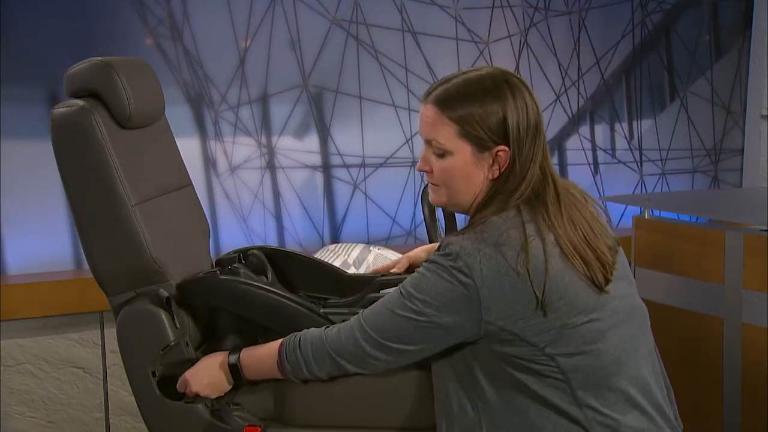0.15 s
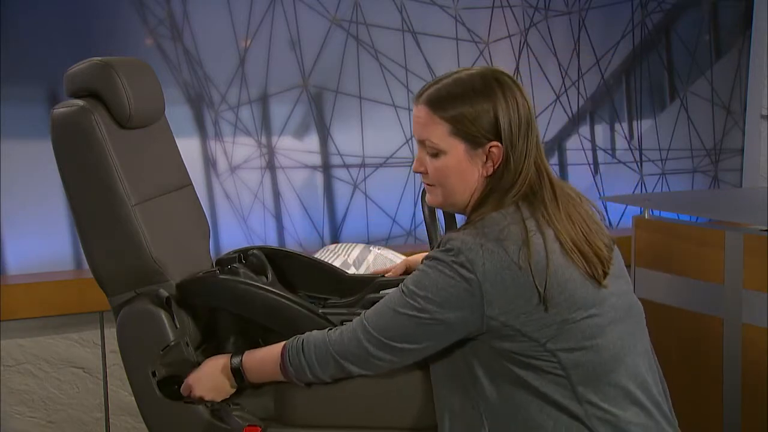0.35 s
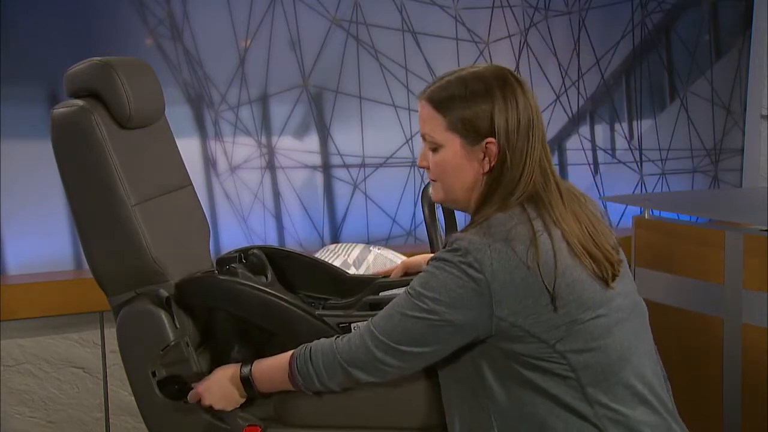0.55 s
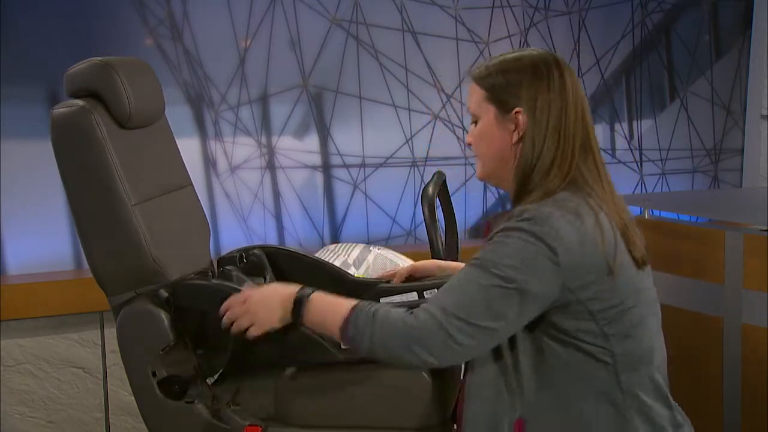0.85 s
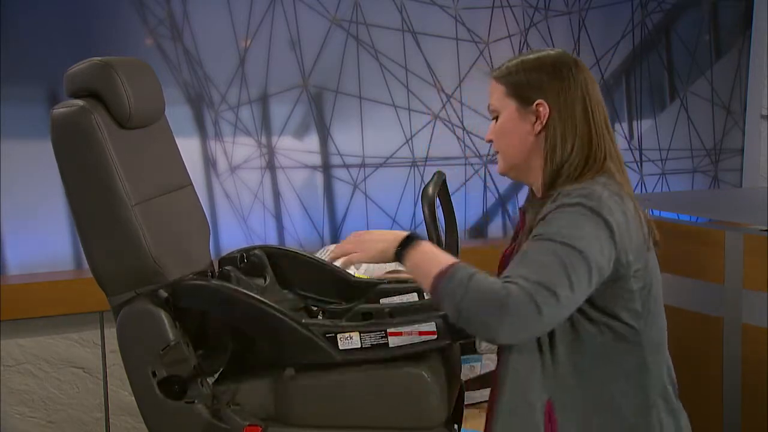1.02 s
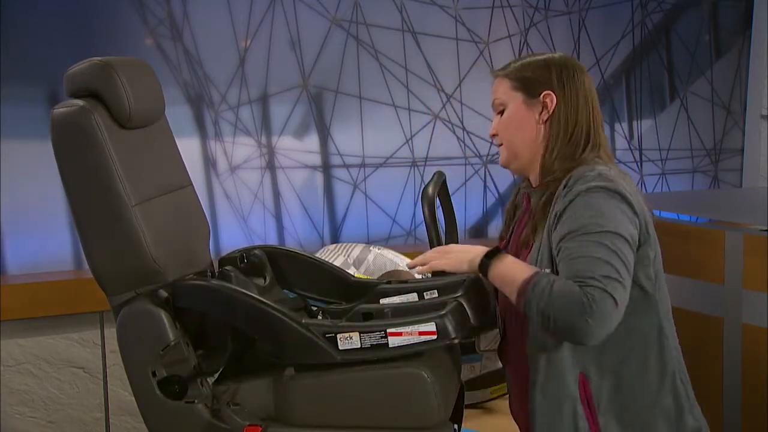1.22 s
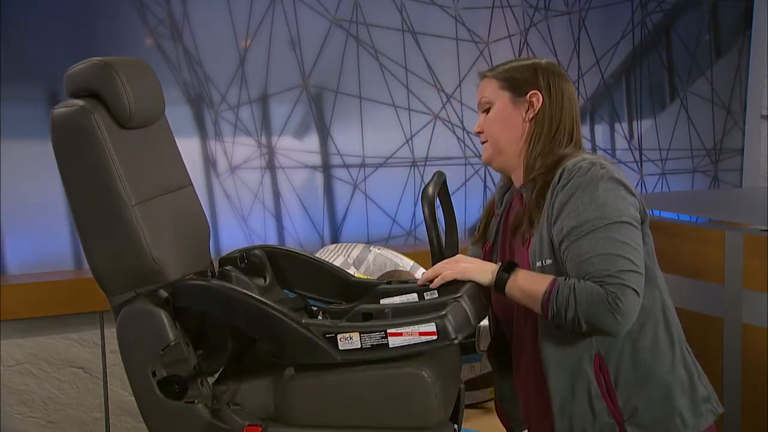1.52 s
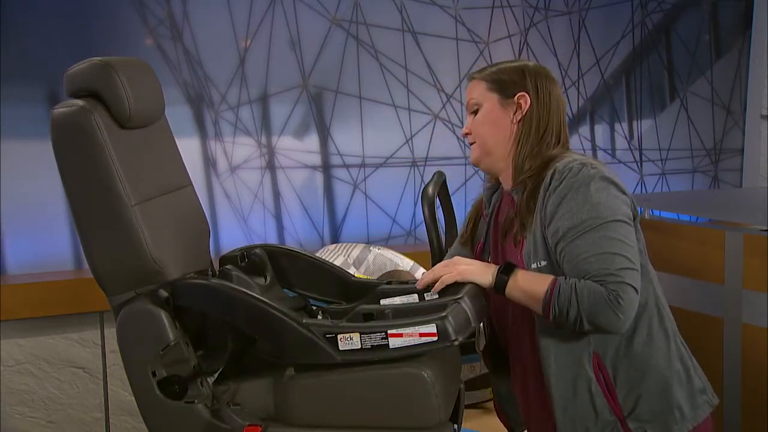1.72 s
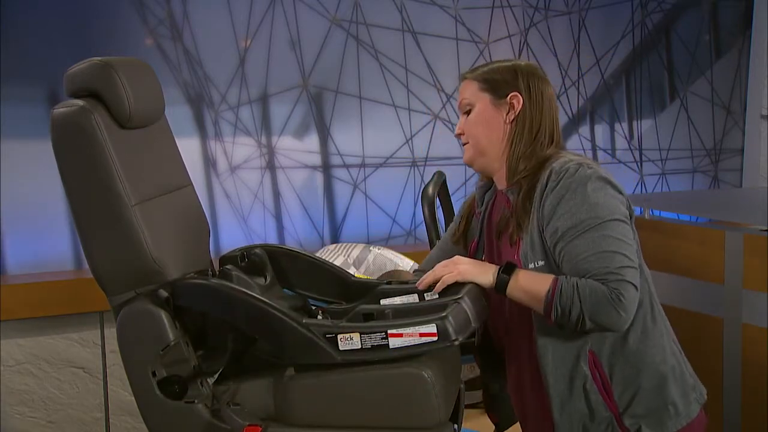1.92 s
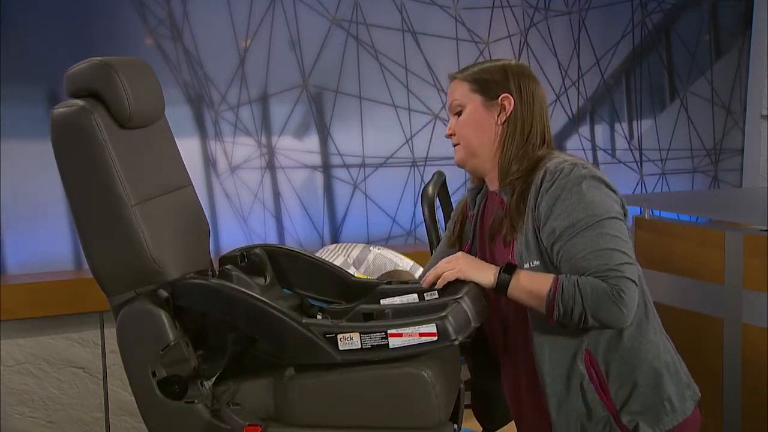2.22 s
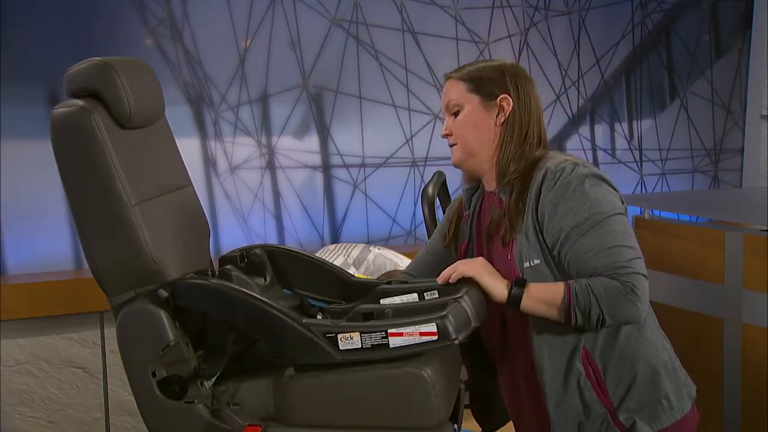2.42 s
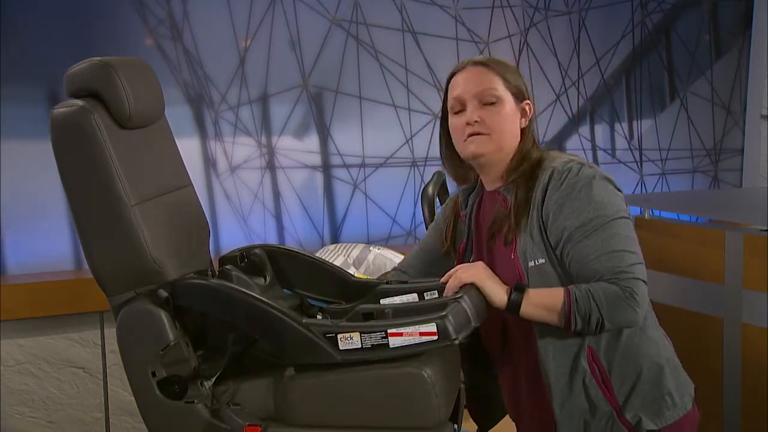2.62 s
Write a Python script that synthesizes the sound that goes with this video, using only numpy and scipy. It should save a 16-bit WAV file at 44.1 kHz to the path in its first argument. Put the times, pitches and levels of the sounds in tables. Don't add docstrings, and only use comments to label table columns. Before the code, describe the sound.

Dull plastic thuds and a sharp metal hook snap as a child seat base is fitted

```python
import sys
import numpy as np
from scipy import signal
from scipy.fft import rfft, irfft
from scipy.io import wavfile

SR = 44100
rng = np.random.default_rng(int(sys.argv[2]) if len(sys.argv) > 2 else 0)


def waveform_to_disk(signal):
    frames = np.transpose(np.atleast_2d(signal))
    scaled = np.clip(frames, -1, 1) * 32767
    samples = np.round(scaled).astype(np.int16)
    wavfile.write(sys.argv[1], SR, samples)


def ratio_of_db(decibels):
    return 10 ** (np.asarray(decibels, float) / 20)


N = 121275

# frequency in Hz, level in dB.
AIR_SPECTRUM = [(15, -65), (25, 1), (130, 5.5), (354, -10.5), (427, -12.5), (695, -21.5), (9320, -27),
                (14000, -34.5), (16000, -52)]
# frequency in Hz, level in dB.
FAN_HUMS = [(118, -62), (428, -66.5)]
# start in seconds, length in seconds, cloth hiss in dB, shell rumble in dB,
# share of the length spent rising.
STROKES = [(-0.05, .2, -37.5, -31.5, 0.51), (0.127, 0.079, -82, -40, .2), (0.324, 0.1, -53.5, -38, 0.13),
           (0.501, 0.26, -50.5, -46, 0.56), (0.649, 0.28, -39, -38, 0.64), (0.913, 0.061, -50.5, -39, .5),
           (1.144, 0.35, -57, -64, 0.69), (1.447, 0.15, -74.5, -59, 0.1), (1.563, 0.076, -49, -42.5, 0.21),
           (1.675, 0.19, -53.5, -46, 0.058), (1.827, 0.069, -61, -64, 0.83), (1.903, 0.22, -58, -47, 0.083),
           (2.04, 0.046, -54, -62, .4), (2.273, 0.034, -47, -42.5, 0.14), (2.474, 0.11, -47.5, -37, 0.22),
           (2.547, 0.23, -47.5, -49.5, 0.067)]
# frequency in Hz, level in dB.
HISS_SPECTRUM = [(710, -7), (1200, 0.5), (1610, 0), (3830, -4), (4170, -6), (7100, -7.5), (11900, -9.5),
                 (16000, -14)]
# frequency in Hz, level in dB.
RUMBLE_SPECTRUM = [(18, -43), (30, -15), (160, 4), (223, -0.5), (347, -2), (1000, -1), (1190, -8.5),
                   (1590, -9), (3000, -23), (3900, -71), (6600, -120)]
# start in seconds, peak in dB, frequency the struck spot favours in Hz,
# crack relative to the peak in dB.
KNOCKS = [(0.04, -22, 583, -78), (0.051, -29, 690, -27), (0.175, -36, 637, -7), (0.193, -41.5, 422, -6),
          (0.262, -29.5, 285, -22), (0.282, -32, 692, -12), (0.304, -34, 568, -34), (0.331, -30, 506, -22),
          (0.354, -32.5, 730, -51), (0.654, -22.5, 2360, -5.5), (0.675, -11.5, 280, -27),
          (0.743, -25, 266, -7), (0.842, -27.5, 212, -21), (0.943, -38, 245, -7), (1.257, -41.5, 306.5, -8),
          (1.327, -37.5, 250, -19), (1.383, -30, 202, -28), (1.458, -40.5, 750, -18),
          (1.564, -19, 217, -41), (1.596, -25.5, 250, -21), (1.665, -5, 243, -16), (1.754, -23.5, 240, -35),
          (1.782, -16.5, 283, -33.5), (1.894, -11, 285, -26.5), (2.166, -43, 568, -31),
          (2.273, -36, 586, -18.5), (2.294, -39.5, 468, -9.5), (2.31, -6.5, 713, -23)]
# frequency in Hz, level in dB, T60 in seconds.
SHELL_MODES = [(203, -11, 0.056), (245, -1, 0.047), (285, -7.5, 0.049), (456, -3, 0.01), (630, -0.5, 0.031),
               (747, -3.5, .025), (845, 3, 0.021), (1224, -1.5, 0.016), (1613, -2, .012),
               (2240, -1.5, 0.013)]
# frequency in Hz, level in dB.
CLATTER_SPECTRUM = [(200, -43), (500, 4.5), (1200, 1.5), (3000, -14.5), (6000, -33)]
# frequency in Hz, level in dB.
CRACK_SPECTRUM = [(2000, -40), (3000, 9.5), (16000, -13)]
# start in seconds, length in seconds, level in dB, slip rate in Hz.
SQUEAKS = [
    (0.065, 0.014, -30.5, 640),
    (0.075, .009, -26, 630),
    (0.087, 0.014, -26, 640),
    (0.105, 0.02, -32.5, 650),
]
# level in dB, from the fundamental up.
SQUEAK_PARTIALS_DB = [-10, 0, -24, -5]
# start in seconds, peak in dB, rattle T60 in seconds, ring of the low modes in dB,
# ring of the high modes in dB.
HOOK_HITS = [
    (0.4062, -18.5, 0.051, -4, -33),
    (0.4132, -7, 0.016, -11.5, -12.5),
]
# start in seconds, peak in dB, rattle T60 in seconds, ring of the low modes in dB,
# ring of the high modes in dB.
BUCKLE_HITS = [
    (2.458, -17, 0.018, -15, -16.5),
    (2.4635, -27.5, 0.091, 11, -9),
    (2.538, -14.5, 0.039, -11.5, -5.5),
]
# frequency in Hz, level in dB, T60 in seconds.
HOOK_MODES = [(650, -1, .025), (1640, -4, .025), (2900, -4, .02), (4015, -29, .55), (4110, -6, .07),
              (7763, -30, .45), (7900, -6, .04), (8915, -30, .45), (10640, -32, .3), (12060, -28, .2)]
# frequency in Hz, level in dB, T60 in seconds.
BUCKLE_MODES = [(250, -9, .06), (400, -13, .06), (700, -9, .04), (870, -9, .05), (1217, -7, .07),
                (1453, -16, .4), (1529, -10, .12), (2751, -22, .12), (3208, -23, .3), (7854, -8, .07),
                (7975, -16, .32), (11340, -26, .25), (13480, -23, .2)]
# frequency in Hz, level in dB.
RATTLE_SPECTRUM = [(180, 8), (300, -0.5), (3950, -2), (5340, -12), (8090, -3.5), (9550, -10),
                   (14500, -17.5), (16000, -32)]
# frequency in Hz, level in dB.
SWAY_SPECTRUM = [(20, -1), (50, -3.5), (200, -5.5), (400, -22), (1000, -72)]
# frequency in Hz, level in dB.
SPRAY_SPECTRUM = [(6000, -40), (9000, -9), (12500, 3), (14500, 11), (16000, 2)]
# frequency in Hz, T60 in seconds.
STUDIO_T60 = [(100, .5), (300, .5), (1000, 0.9649), (3000, 0.46), (8000, 0.57), (15000, .35)]
# frequency in Hz, level in dB.
STUDIO_COLOUR = [(70, -16), (200, 2.5), (1000, -7.5), (3000, -3), (8000, 0), (15000, 1)]
# delay in seconds, level in dB.
ECHOES = [(0.0139, -16), (0.029, -21.5), (0.04, -21.5)]


def rms_one(x):
    return x / np.sqrt(np.mean(x ** 2) + 1e-20)


def at_hz(points, hz):
    table_hz, values = np.transpose(points)
    return np.interp(np.log(hz), np.log(table_hz), values)


def band_pass(x, order, low_hz, high_hz):
    sos = signal.butter(order, [low_hz, high_hz], "band", fs=SR, output="sos")
    return signal.sosfilt(sos, x)


def coloured(spectrum):
    hz = np.maximum(np.fft.rfftfreq(N, 1 / SR), 1)
    white = rfft(rng.standard_normal(N))
    return rms_one(irfft(white * ratio_of_db(at_hz(spectrum, hz)), N))


def drift(rate_hz):
    pole = np.exp(-2 * np.pi * rate_hz / SR)
    noise = rng.standard_normal(N + SR)
    settled = signal.lfilter([1], [1, -2 * pole, pole * pole], noise)[SR:]
    return rms_one(settled)


def ring(start, db, hz, t60):
    impulses = np.full(N, 1e-18)
    impulses[(start * SR).astype(int)] = ratio_of_db(db)
    radius = ratio_of_db(-60 / (t60 * SR))
    angle = 2 * np.pi * hz / SR
    return signal.lfilter([0, np.sin(angle)], [1, -2 * radius * np.cos(angle), radius ** 2], impulses)


def dying(start, db, t60):
    t = np.arange(N) / SR - start[:, None]
    level_db = db[:, None] - 60 * np.maximum(t, 0) / np.reshape(t60, (-1, 1))
    return np.sum((t >= 0) * ratio_of_db(level_db), axis=0)


def hump(start, length, rise, power):
    u = (np.arange(N) / SR - start) / length
    ramp = np.minimum(u / rise, (1 - u) / (1 - rise))
    return np.sin(np.pi / 2 * np.clip(ramp, 0, 1)) ** (2 * power)


def air():
    flow = ratio_of_db(-56.5 + 1.5 * drift(2.4)) * coloured(AIR_SPECTRUM)
    for hz, db in FAN_HUMS:
        hum = band_pass(rng.standard_normal(N), 1, hz - 5, hz + 5)
        flow = flow + ratio_of_db(db) * rms_one(hum)
    return flow


def rubbing():
    hiss_level, rumble_level = np.zeros(N), np.zeros(N)
    for start, length, hiss_db, rumble_db, rise in STROKES:
        stroke = hump(start, length, rise, 0.58)
        hiss_level += ratio_of_db(hiss_db) * stroke
        rumble_level += ratio_of_db(rumble_db) * stroke
    hiss = hiss_level * ratio_of_db(1.5 * drift(65)) * coloured(HISS_SPECTRUM)
    rumble = rumble_level * ratio_of_db(2.6 * drift(33)) * coloured(RUMBLE_SPECTRUM)
    return hiss + rumble


def shell():
    spot_octaves, spot_floor_db = 1.28, -13
    soft_dulling = 0.19
    start, db, spot_hz, crack_db = np.transpose(KNOCKS)
    released = start + 0.0015
    chance_db = rng.normal(0, 2.4, (len(start), len(SHELL_MODES)))
    body = np.zeros(N)
    for k, (hz, level_db, t60) in enumerate(SHELL_MODES):
        octaves = np.log2(hz / spot_hz)
        near_db = np.maximum(-6 * (octaves / spot_octaves) ** 2, spot_floor_db)
        near_db += soft_dulling * (db - db.max()) * np.maximum(octaves, 0)
        sign = (-1) ** ((k + 1) // 2)
        body += sign * ring(released, db - 3.5 + level_db + near_db + chance_db[:, k], hz, t60)
    body = band_pass(body, 2, 170, 2200)
    thump = ring(released, db - 21.5, 69, 0.041)
    clatter = coloured(CLATTER_SPECTRUM) * dying(released, db - 20, 0.06)
    crack = coloured(CRACK_SPECTRUM) * dying(start, db + crack_db - 1.5, 0.011)
    return body + thump + clatter + crack


def squeak():
    out = np.zeros(N)
    wobble = 1 + 0.05 * drift(93)
    for start, length, db, rate_hz in SQUEAKS:
        phase = 2 * np.pi * np.cumsum(rate_hz * wobble) / SR
        chirp = np.zeros(N)
        for number, partial_db in enumerate(SQUEAK_PARTIALS_DB, 1):
            chirp += ratio_of_db(partial_db) * np.sin(number * phase)
        out += ratio_of_db(db) * hump(start, length, 0.37, 0.65) * chirp
    return out


def latch(hits, modes, thump_db, sway_db, spray_db):
    start, db, rattle_t60, low_db, high_db = np.transpose(hits)
    rattle = coloured(RATTLE_SPECTRUM) * dying(start, db - 5, rattle_t60)
    thump = ring(start, db + thump_db, 46.3, 0.041)
    sway = coloured(SWAY_SPECTRUM) * dying(start, db + sway_db, 0.74)
    spray = coloured(SPRAY_SPECTRUM) * dying(start, db + high_db + spray_db, 0.062)
    steel = np.zeros(N)
    for hz, level_db, t60 in modes:
        ring_db = high_db if hz > 2500 else low_db
        waver = ratio_of_db(4 * drift(130))
        steel += waver * ring(start, db + ring_db + level_db, hz, t60)
    return rattle + thump + sway + spray + steel


def studio(x):
    t = np.arange(SR // 2) / SR
    edges_hz = 40 * 2.0 ** np.arange(0, 9, 0.5)
    tail = np.zeros(len(t))
    for low_hz, high_hz in zip(edges_hz, edges_hz[1:]):
        band = band_pass(rng.standard_normal(len(t)), 2, low_hz, high_hz)
        hz = np.sqrt(low_hz * high_hz)
        tail += band * ratio_of_db(at_hz(STUDIO_COLOUR, hz) - 60 * t / at_hz(STUDIO_T60, hz))
    build_up = 1 - np.exp(-(t / 0.0069) ** 2)
    tail *= build_up * ratio_of_db(-12) / np.sqrt(SR / 40)
    for delay, db in ECHOES:
        tail[int(delay * SR)] += ratio_of_db(db)
    return signal.fftconvolve(x, tail)[:N]


def scene():
    rub, chirps = rubbing(), squeak()
    hook = latch(HOOK_HITS, HOOK_MODES, thump_db=-14, sway_db=-49, spray_db=2.5)
    buckle = latch(BUCKLE_HITS, BUCKLE_MODES, thump_db=-18, sway_db=-27.5, spray_db=-32.5)
    far = shell() + buckle
    wet = studio(far + ratio_of_db(-5) * hook + ratio_of_db(-6) * rub + ratio_of_db(-5.5) * chirps)
    return (far + hook + chirps + rub + wet + air())[None]


def roll_off(x):
    return signal.sosfilt(signal.butter(12, 16370, fs=SR, output="sos"), x)


def record(dry):
    low_pass = signal.cheby1(8, 1, 15500, fs=SR, output="sos")
    mix = signal.sosfilt(low_pass, dry)
    return roll_off(mix)


dry = scene()
out = record(dry)
waveform_to_disk(out)
```